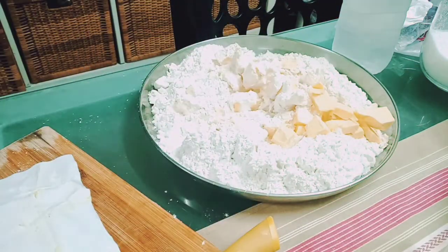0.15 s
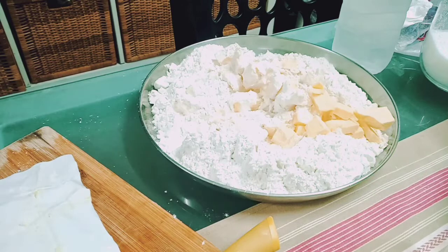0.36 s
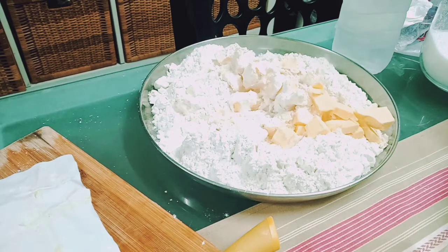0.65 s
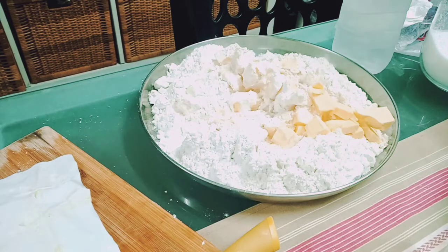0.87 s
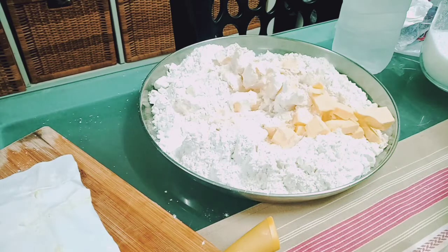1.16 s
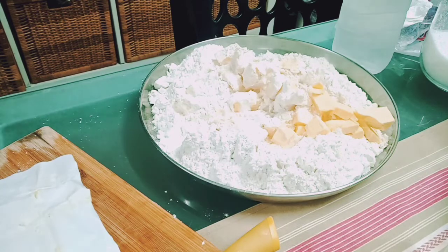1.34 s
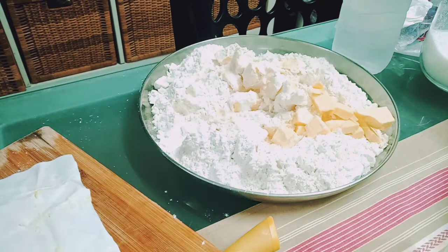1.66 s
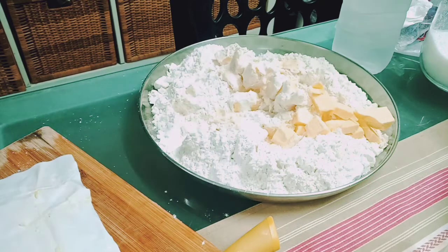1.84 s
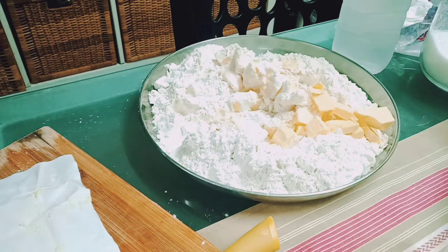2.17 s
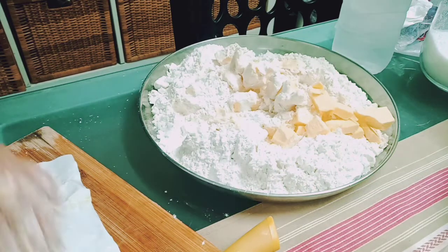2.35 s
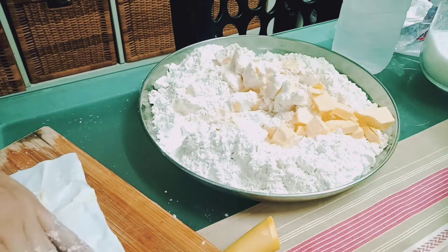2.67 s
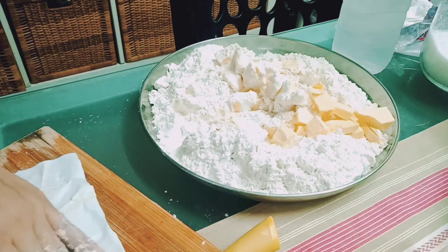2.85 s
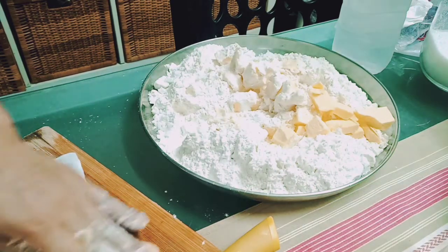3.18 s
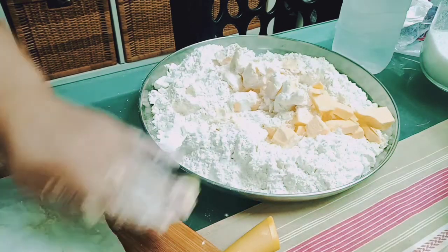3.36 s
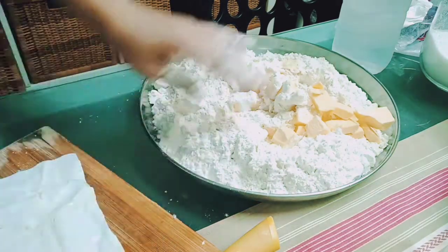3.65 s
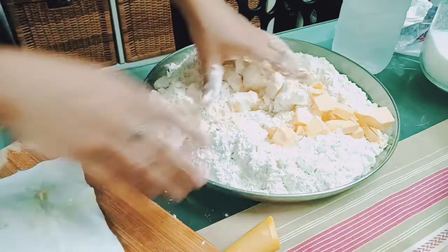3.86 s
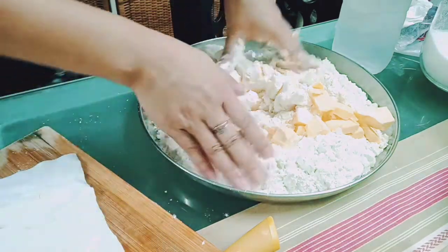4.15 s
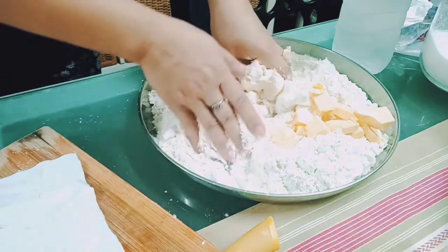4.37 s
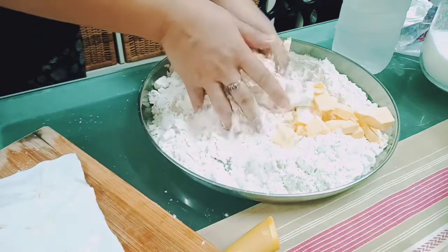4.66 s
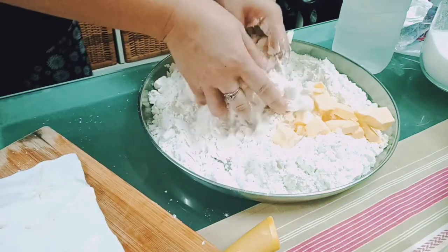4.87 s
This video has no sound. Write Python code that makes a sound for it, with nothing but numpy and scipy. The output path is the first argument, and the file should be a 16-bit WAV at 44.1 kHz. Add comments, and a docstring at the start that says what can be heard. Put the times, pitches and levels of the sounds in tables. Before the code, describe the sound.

A quiet kitchen hush with a faint, wavering high tone and a low hum lasts throughout, heard close and nearly mono. Soft, low thuds of hands on a worktop recur irregularly, with light brushes of skin. Brief dry rustles with sharp ticks come at about 0.4 and 0.95 seconds. A louder, crisp rustle swishes from 1.4 to 1.6 seconds, and another follows from 1.9 to 2.1, opening with a sharp snap and a thud. Smaller ticks and more thuds fall between 2.4 and 2.9 seconds. From 3 to about 3.8 seconds a palm wipes over paper on a wooden board, a dry slide that is strongest near 3.2 and ends with a small tick. From 3.9 seconds fingers push into flour in a metal bowl, making short, soft, powdery rubs with a dull ring and low bumps, then two fainter rubs just before 5 seconds.

```python
"""A faint high tone hangs in a quiet kitchen, over light brushes of skin and soft thuds of hands on the worktop.
Pastry is being made: dry ticks and rustles sound beside the metal bowl, a palm wipes over butter paper
on a wooden board, then fingers push into the flour. Each rub is a mass of tiny slips, and the hands'
weight shakes the worktop's low resonances. The microphone is close to the work and nearly mono."""
import sys
import numpy as np
from scipy import signal
from scipy.fft import rfft, irfft
from scipy.io import wavfile

SR = 44100
rng = np.random.default_rng(int(sys.argv[2]) if len(sys.argv) > 2 else 0)


def generate_wav(sig):
    """Save sig (samples, or channels by samples) to the path in sys.argv[1] as 16-bit PCM at SR."""
    pcm = np.round(np.clip(np.atleast_2d(sig).T, -1, 1) * 32767).astype(np.int16)
    wavfile.write(sys.argv[1], SR, pcm)


N = 221104
TIME = np.arange(N) / SR

# Levels in the tables are relative; each source sets its own gain.
# room tone of the kitchen: (frequency [Hz], level [dB])
ROOM_SPECTRUM = [(15, -60), (28, -32), (50, -15), (84, -16), (113, -2.5), (170, -19.5), (211, -5),
                 (269, -8.5), (299, -8), (437, -18), (587, -16), (769, -14), (1220, -21), (1550, -24),
                 (4330, -36), (15800, -49.5)]
# a very faint, fluttering hiss that differs between left and right: (frequency [Hz], level [dB])
SIDE_SPECTRUM = [(15, -44), (25, -18), (82, -9), (164, -13), (281, -7.5), (703, -7), (895, -19), (1270, 2),
                 (1750, -13), (2770, -11), (5730, -17), (8350, -25.5), (15500, -22)]
# light brushes of skin: (time [s], level [dB], half length [s])
BRUSHES = [(0.01, -65, 0.018), (0.22, -62.5, 0.015), (0.31, -68, 0.029), (0.706, -59.5, 0.017),
           (0.77, -65, 0.041), (1.15, -70, 0.015), (2.24, -71.5, 0.3), (2.63, -63.5, 0.037),
           (2.792, -60, 0.029)]
# hands landing on the worktop: (time [s], level [dB], knock offset [dB])
THUDS = [(0.206, -41.5, -6), (0.426, -41.5, -1), (0.937, -40, -1), (1.003, -39.5, 0), (1.485, -37.5, -5),
         (1.61, -38.5, -16), (1.831, -38, -9), (1.941, -32.5, -2.5), (2.057, -38.5, -6), (2.297, -40, -1),
         (2.52, -46, -6), (2.641, -33, -6), (2.758, -33.5, -17), (2.871, -38.5, -6), (2.993, -44, 6.5),
         (3.23, -36, -26), (3.42, -40.5, -7), (3.584, -39, -24), (3.68, -45, -18), (3.917, -40, -9),
         (4.034, -35.5, -20), (4.158, -36.5, -15), (4.209, -45, -2), (4.374, -33.5, -7), (4.503, -34, -7.5),
         (4.53, -48, -11), (4.62, -45, -9), (4.67, -53, 1), (4.845, -47.5, -15)]
# resonances of the worktop: (frequency [Hz], width [Hz], level [dB])
WORKTOP_MODES = [(128.5, 22.7, 0.5), (158.4, 23.6, 0.5), (214, 30, -0.5), (322, 170, -11), (425.5, 12, -16)]
# sharp ticks: (time [s], peak [dB], centre [Hz], width [Hz], 60 dB decay [s], ring re snap [dB])
TICKS = [(0.362, -33, 3280, 2000, 0.017, -16), (0.4124, -23.5, 4950, 6640, 0.005, -9.5),
         (0.4259, -25.5, 5460, 3900, 0.01, -12), (0.9506, -20.5, 3720, 1290, 0.0024, -19.5),
         (0.9585, -28, 4300, 4040, 0.0026, -20), (1.9146, -21.5, 2090, 3000, 0.038, -34),
         (1.921, -17, 1860, 1820, 0.01, -29), (2.069, -27, 2230, 900, 0.014, -34),
         (2.429, -37, 2200, 1980, 0.0077, -22), (2.438, -34.5, 3140, 2400, 0.0092, 0),
         (2.561, -38, 1940, 443, 0.008, -5), (2.638, -39.5, 2030, 1120, 0.051, -3),
         (2.86, -46.5, 1190, 298, 0.025, -9), (2.985, -36, 2470, 3000, 0.026, -19),
         (3.234, -48, 2240, 500, 0.0056, -22), (3.757, -40.5, 2180, 2480, 0.035, -1)]
# strokes beside the bowl, over the paper and into the flour:
# (start [s], length [s], level [dB], body offset [dB], sheen offset [dB])
RUSTLE_STROKES = [(0.365, 0.034, -45.5, 0, -8), (0.414, 0.024, -44.5, 1.5, 3), (0.914, 0.05, -55.5, 2, -28),
                  (0.954, 0.019, -46, -24, 4.5), (1.388, 0.044, -40.5, -4, 1),
                  (1.41, 0.2, -34.5, -10.5, -4), (1.912, 0.033, -39, -5, 1), (1.972, 0.13, -37, -7, -4),
                  (2.385, 0.032, -51, 0.5, -11.5), (2.436, 0.0096, -45, 5, -38)]
WIPE_STROKES = [(2.985, 0.38, -41.5, -7.5, -5), (3.28, 0.16, -52.5, 1, -28), (3.39, 0.12, -50, 2.5, -17),
                (3.53, 0.089, -52, 1.5, -14), (3.676, 0.028, -49.5, -3.5, -14.5),
                (3.764, 0.012, -52, 4.5, -8.5)]
FLOUR_STROKES = [(3.908, 0.051, -63, 7, -16), (4.025, 0.096, -46.5, -2.5, -18),
                 (4.155, 0.089, -46, -10.5, -11), (4.28, 0.095, -43.5, -4.5, -13),
                 (4.82, 0.079, -62, -1.5, -24), (4.935, 0.043, -53.5, -3.5, -13.5)]
# friction spectra of the same three, heard close: (frequency [Hz], level [dB])
RUSTLE_SPECTRUM = [(210, -29), (350, -8.5), (459, -17.5), (602, -14), (1090, -10.5), (1270, -2),
                   (1470, -5.5), (2260, 1.5), (4700, -1.5), (6680, -8.5), (7960, -10.5), (13900, -31),
                   (15100, -31), (15800, -29)]
WIPE_SPECTRUM = [(210, -34), (350, -9), (574, -18.5), (740, -9), (1090, -14), (1270, -4.5), (1520, -13),
                 (2150, -3.5), (2650, -6.5), (4280, -8.5), (8900, -25), (13500, -46), (15800, -45)]
FLOUR_SPECTRUM = [(210, -33), (350, -26), (445, -28), (521, -6.5), (565, -12), (717, -6.5), (1120, -8),
                  (1250, -1.5), (1990, -10), (3060, -9.5), (5340, -14.5), (9040, -20.5), (15800, -49)]
# swishes under a sliding hand: (time [s], half length [s], centre [Hz], fall [octaves/s], level [dB])
SWISHES = [(1.485, 0.025, 6530, 2.3, -32.5), (1.494, 0.041, 1866, 10, -43.5),
           (1.563, 0.0068, 2770, 12.5, -33.5), (1.613, 0.011, 1133, 6, -38),
           (2.002, 0.028, 5940, 3.5, -36.5), (2.034, 0.022, 4570, 5, -36), (2.243, 0.018, 1434, 1, -57),
           (2.575, 0.028, 5300, -1, -69.5), (3.118, 0.0067, 4390, 2.8, -42.5),
           (3.182, 0.024, 3900, 1.5, -45), (3.245, 0.009, 2224, 0, -37.5), (3.247, 0.02, 4450, 0.28, -53)]
# hollow under the wiping palm: (time [s], pitch [Hz])
PALM_PITCH = [(3.08, 2190), (3.18, 1982), (3.216, 2184), (3.302, 2200), (3.396, 1806), (3.556, 1975),
              (3.6, 1810)]
# peaks and dips of the microphone port: (frequency [Hz], width [Hz], gain [dB])
MIC_PORT = [(6290, 290, -13), (6700, 250, -1.5), (7990, 1520, -6), (8760, 980, 2), (10500, 430, 1),
            (13400, 1700, -1), (14960, 500, 9)]


def from_db(db):
    """Decibels to gain."""
    return 10 ** (np.asarray(db) / 20)


def unit_rms(x):
    """Scale to rms 1."""
    return x / np.sqrt(np.mean(x ** 2) + 1e-20)


def band(x, low_hz, high_hz):
    """Butterworth band-pass."""
    sos = signal.butter(2, [low_hz, min(high_hz, .45 * SR)], "band", fs=SR, output="sos")
    return signal.sosfilt(sos, x + 1e-18)


def resonate(x, hz, width_hz):
    """Two-pole resonance with unit gain at its peak."""
    return signal.lfilter(*signal.iirpeak(hz, hz / width_hz, fs=SR), x + 1e-18)


def coloured(x, spectrum):
    """Give a steady sound a smooth spectrum; rms 1."""
    hz, db = np.transpose(spectrum)
    bin_hz = np.maximum(np.arange(N // 2 + 1) * SR / N, 1)
    gain = from_db(np.interp(np.log(bin_hz), np.log(hz), db))
    return unit_rms(irfft(rfft(x) * gain, N))


def drift(rate_hz):
    """Smooth random wander; rms 1."""
    slow = signal.sosfilt(signal.butter(2, rate_hz, fs=SR, output="sos"), rng.standard_normal(N + SR))
    return unit_rms(slow[SR:])


def noisy_tone(hz, width_hz):
    """Noise narrowed around one pitch; rms 1."""
    return unit_rms(resonate(resonate(rng.standard_normal(N), hz, width_hz), hz, width_hz))


def bump(time_s, half_length_s):
    """A smooth swell and fade around a moment."""
    return np.exp(-((TIME - time_s) / half_length_s) ** 2 / 2)


def room_tone():
    """The kitchen's hush, with a faint high tone and a low hum that both waver."""
    hush = from_db(-58.5) * coloured(rng.standard_normal(N), ROOM_SPECTRUM)
    tone = from_db(-64.5 + 3.1 * drift(16.4)) * noisy_tone(1258, width_hz=120)
    hum = from_db(-63.5 + 2.0 * drift(27)) * noisy_tone(135.4, width_hz=40)
    return hush + tone + hum


def rumble(pressing):
    """The weight of the hands moves the whole table, very low."""
    return from_db(-11.5) * pressing * noisy_tone(72, width_hz=50)


def brushes():
    """Skin brushes lightly between strokes, in small swells of noise."""
    touch = sum(from_db(db) * bump(time_s, half_length_s) for time_s, db, half_length_s in BRUSHES)
    return touch * coloured(rng.standard_normal(N), FLOUR_SPECTRUM)


def worktop_shake():
    """A random force rings the worktop; the hand damps the peaks, so the shaking stays even."""
    force = rng.standard_normal(N)
    modes = sum((-1) ** k * from_db(db) * unit_rms(resonate(force, hz, width_hz))
                for k, (hz, width_hz, db) in enumerate(WORKTOP_MODES))
    ring = signal.hilbert(modes)
    evened = ring.real / (np.abs(ring) + 0.5 * np.std(ring))
    return unit_rms(band(evened, 98, 480))


def worktop(pressing, attack_s=0.017, hold_s=0.027, t60_s=0.18):
    """Soft blows and steady pressing shake the same low resonances; the blows also knock."""
    thud, knock = np.zeros(N), np.zeros(N)
    for time_s, db, knock_db in THUDS:
        age = np.maximum(TIME - time_s + 0.012, 0)  # the flesh gives way just before the blow lands
        blow = from_db(db - 60 * np.maximum(age - hold_s, 0) / t60_s) * np.minimum(age / attack_s, 1)
        thud += blow
        knock += blow * from_db(knock_db)
    knocks = from_db(-13.5) * knock * unit_rms(band(rng.standard_normal(N), 270, 1280))
    thuds = from_db(-7.5) * thud * worktop_shake()
    return thuds + knocks + pressing * worktop_shake()


def ticks(ring_hz=1300, ring_t60_s=0.038):
    """Each snap is a sharp pulse with a brief crunch behind it; it wakes a ring near the high tone."""
    out, age = np.zeros(N), TIME[:SR // 12]
    ring = from_db(-60 * age / ring_t60_s) * np.sin(2 * np.pi * ring_hz * age)
    for time_s, db, hz, width_hz, t60_s, ring_db in TICKS:
        crunch = rng.choice([-1, 1], len(age)) * from_db(-60 * age / t60_s)
        crunch[0] = 4  # the opening pulse
        snap = band(resonate(crunch, hz, width_hz), 680, hz + width_hz + 1000)
        at = round(time_s * SR)
        out[at:at + len(age)] += from_db(db) * (snap / np.abs(snap).max() + from_db(ring_db) * ring)
    return out


def scatter(sound, t60_s=0.025, change_hz=7.26):
    """Reflections off nearby surfaces, along four paths whose shares shift as the hand moves."""
    paths = rng.standard_normal((4, SR // 100)) * from_db(-60 * TIME[:SR // 100] / t60_s)
    paths[:, :SR // 2000] = 0  # nothing returns in the first half millisecond
    shares = np.array([drift(change_hz) for _ in paths])
    shares /= np.linalg.norm(shares, axis=0)
    return sum(share * signal.oaconvolve(sound, path / np.linalg.norm(path))[:N]
               for share, path in zip(shares, paths))


def friction(slips_per_s, spread_db, hiss, clump_db):
    """Countless tiny slips over a smooth hiss, coming in clumps and scattered on their way."""
    sizes = from_db(spread_db * np.minimum(rng.exponential(1, N), 3)) * rng.choice([-1, 1], N)
    slips = unit_rms(sizes * (rng.random(N) < slips_per_s / SR))
    rub = (slips + hiss * rng.standard_normal(N)) * from_db(clump_db * drift(55))
    return rub + from_db(-1.5) * scatter(rub)


def stroke_db(start, length, rise_db_per_s, arch_db, release_db_per_s):
    """A stroke rises into contact, crests halfway as the hand speeds up, then dies; dB re crest."""
    age = TIME - start
    rise = rise_db_per_s * np.minimum(age, 0)
    arch = arch_db * (2 * np.clip(age / length, 0, 1) - 1) ** 2
    release = release_db_per_s * np.maximum(age - length, 0)
    return np.maximum(rise - arch - release, -150)


def strokes(rows, spectrum, slips, **shape):
    """Rubbing strokes: pressure adds body, speed adds sheen; overlapping strokes add in power."""
    rub = coloured(slips, spectrum)
    lows, without_sheen = (signal.sosfiltfilt(signal.butter(3, hz, fs=SR, output="sos"), rub)
                           for hz in (1600, 7000))
    body = lows / np.std(band(lows, 600, 1600))
    middle = unit_rms(without_sheen - lows)
    sheen = unit_rms(rub - without_sheen)
    body_power = middle_power = sheen_power = 0
    for start, length, db, body_db, sheen_db in rows:
        swell_db = stroke_db(start, length, **shape)
        power = from_db(db + swell_db) ** 2
        middle_power += power
        body_power += power * from_db(body_db - 4.5) ** 2
        sheen_power += from_db(db + sheen_db + 1.57 * swell_db) ** 2  # swells and fades more steeply
    return np.sqrt(body_power) * body + np.sqrt(middle_power) * middle + np.sqrt(sheen_power) * sheen


def rustles():
    """Short rustles beside the bowl, made crisp by a few large slips among the small."""
    slips = friction(slips_per_s=4500, spread_db=7, hiss=0.65, clump_db=1)
    return from_db(-1.7) * strokes(RUSTLE_STROKES, RUSTLE_SPECTRUM, slips,
                                   rise_db_per_s=1321, arch_db=5.5, release_db_per_s=258)


def hand_pressure(resting_db=-65):
    """Every stroke also leans on the worktop, the harder the louder it rubs."""
    power = from_db(resting_db) ** 2
    for rows, press_db in (RUSTLE_STROKES, -16.5), (WIPE_STROKES, -7.5), (FLOUR_STROKES, -6):
        for start, length, db, *_ in rows:
            lean_db = stroke_db(start, length, rise_db_per_s=496, arch_db=0, release_db_per_s=190)
            power += from_db(db + press_db + lean_db) ** 2
    return np.sqrt(power)


def hollow(hz, width_hz):
    """Friction noise gathered in a gliding resonance; rms 1."""
    phase = 2 * np.pi * np.cumsum(hz) / SR
    return unit_rms(drift(width_hz / 2) * np.cos(phase) + drift(width_hz / 2) * np.sin(phase))


def swishes():
    """Brief, broad resonances, most falling in pitch as the hollow under a sliding hand opens."""
    out = np.zeros(N)
    for time_s, half_length_s, hz, octaves_per_s, db in SWISHES:
        fall = octaves_per_s * np.clip(TIME - time_s, -.1, .1)
        swish = hollow(hz * 2 ** -fall, width_hz=290 + 0.056 * hz)
        out += from_db(db) * bump(time_s, half_length_s) * swish
    return out


def paper_wipe(crest_s=3.252, swell_db_per_s=49, fade_db_per_s=42):
    """The palm slides over paper; its hollow rings at a wandering pitch, loudest where it is fastest."""
    slips = friction(slips_per_s=1800, spread_db=0, hiss=0.99, clump_db=1)
    slide = strokes(WIPE_STROKES, WIPE_SPECTRUM, slips,
                    rise_db_per_s=516, arch_db=4, release_db_per_s=239)
    times, pitches = np.transpose(PALM_PITCH)
    ring = hollow(np.interp(TIME, times, pitches), width_hz=175)
    contact = np.interp(TIME, [times[0] - .03, times[0], times[-1], times[-1] + .03], [0, 1, 1, 0])
    past_crest = TIME - crest_s
    ring_db = -43.5 - np.maximum(-swell_db_per_s * past_crest, fade_db_per_s * past_crest)
    return from_db(-3) * slide + contact * from_db(ring_db) * ring


def flour():
    """Fingers push through the powder, crumbs crackle and the metal bowl rings dully."""
    slips = friction(slips_per_s=2000, spread_db=2, hiss=0.97, clump_db=-0.05)
    push = strokes(FLOUR_STROKES, FLOUR_SPECTRUM, slips,
                   rise_db_per_s=366, arch_db=0.5, release_db_per_s=298)
    bowl = resonate(push, 1235, width_hz=120)
    return from_db(-1.07) * push + from_db(-7.5) * bowl


def kitchen_walls(x, t60_s, top_hz):
    """Dense reflections reach the microphone from near walls, with a dull top."""
    age = TIME[:SR // 2]
    tail = rng.standard_normal(len(age)) * from_db(-60 * age / t60_s) * (age > .003)
    tail = band(tail, 170, top_hz)
    return signal.fftconvolve(x, tail / np.linalg.norm(tail))[:N]


def scene():
    """The kitchen sits close and central; a very faint, fluttering hiss differs between left and right."""
    rubbing = rustles() + swishes() + paper_wipe() + flour() + brushes()
    snaps = ticks()
    pressing = hand_pressure()
    ring = from_db(1) * resonate(rubbing, 1266, width_hz=52)  # rubbing wakes a ring near the high tone
    walls = from_db(-13.5) * kitchen_walls(rubbing, t60_s=0.23, top_hz=8400)
    walls += from_db(-1) * kitchen_walls(snaps, t60_s=0.17, top_hz=11100)
    mid = rubbing + snaps + ring + walls + worktop(pressing) + rumble(pressing) + room_tone()
    fluttering_hiss = rng.standard_normal(N) * from_db(0.92 * drift(33))
    side = from_db(-76.5) * coloured(fluttering_hiss, SIDE_SPECTRUM)
    return np.array([mid + side, mid - side])


def record(dry):
    """The microphone port colours the treble, and the top is cut steeply at 15.5 kHz."""
    for hz, width_hz, db in MIC_PORT:
        dry = dry + (from_db(db) - 1) * resonate(dry, hz, width_hz)
    return signal.sosfilt(signal.ellip(12, .1, 70, 15500, fs=SR, output="sos"), dry)


dry = scene()
out = record(dry)
generate_wav(out)
```